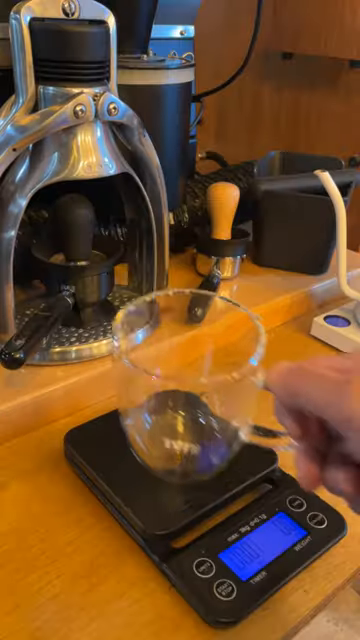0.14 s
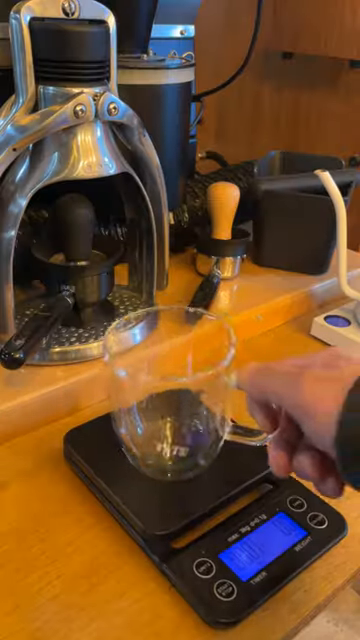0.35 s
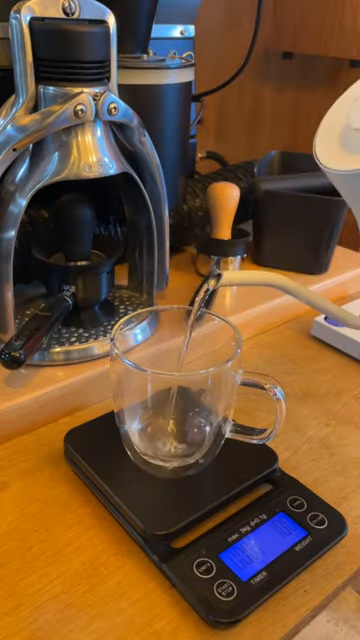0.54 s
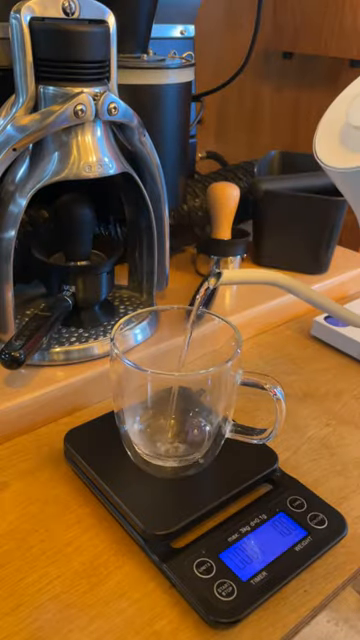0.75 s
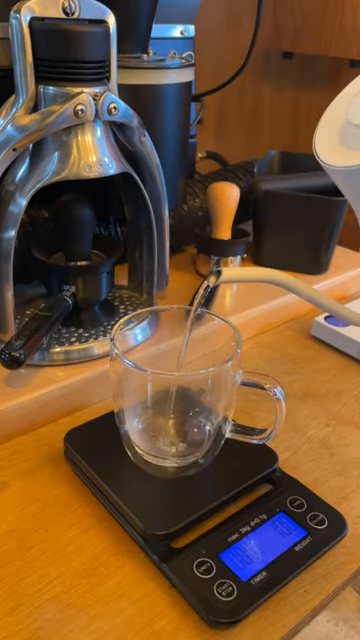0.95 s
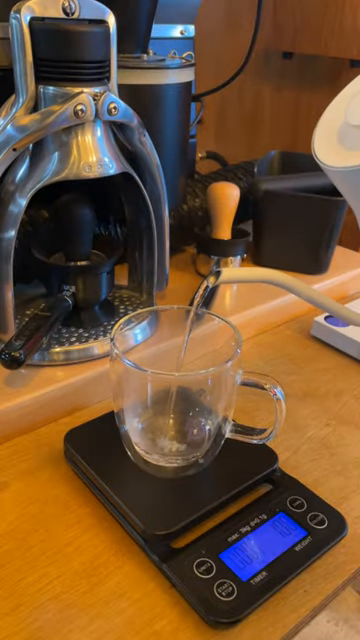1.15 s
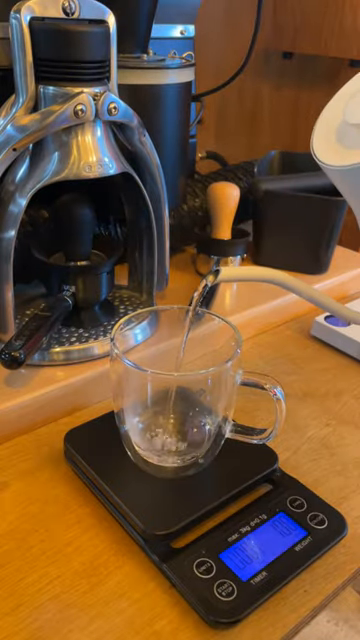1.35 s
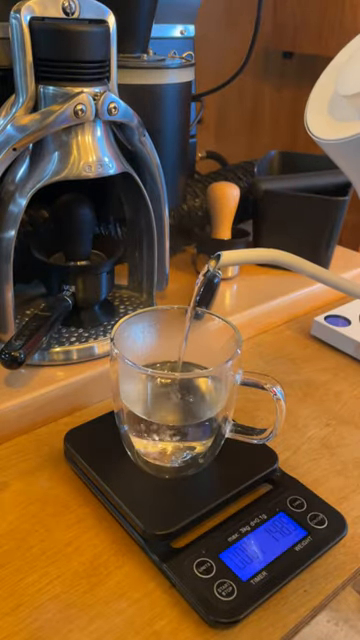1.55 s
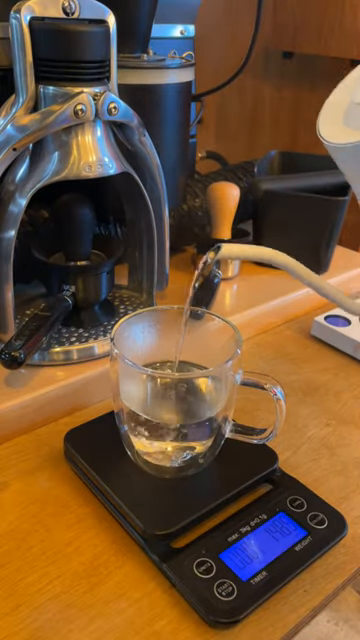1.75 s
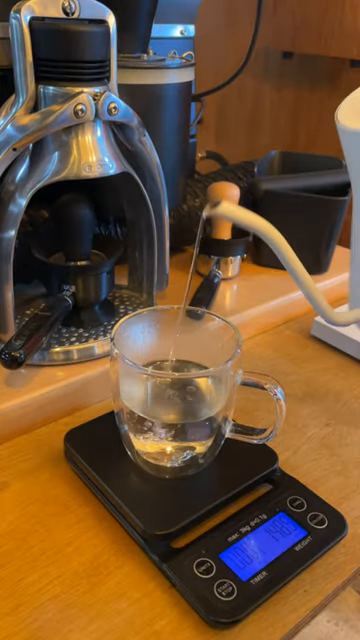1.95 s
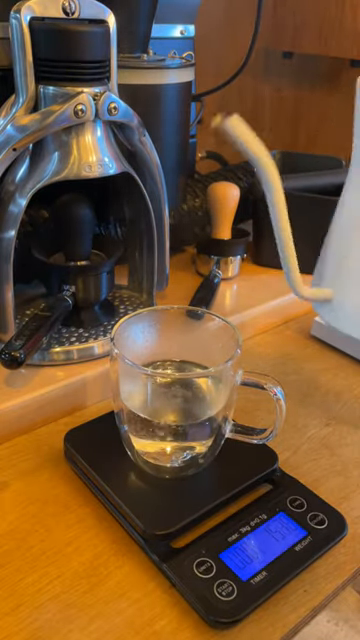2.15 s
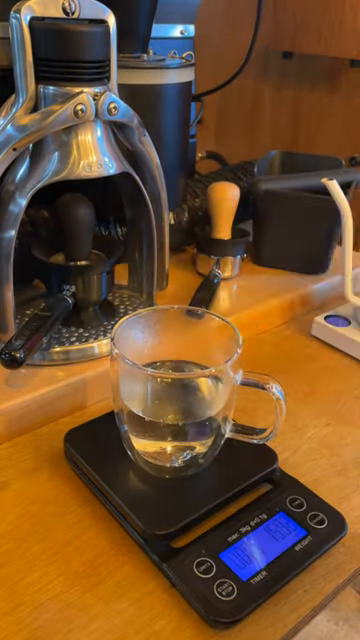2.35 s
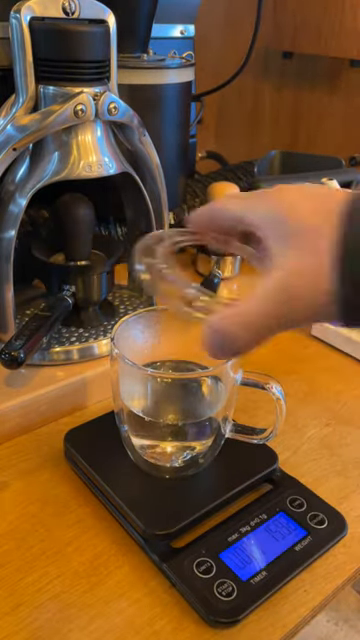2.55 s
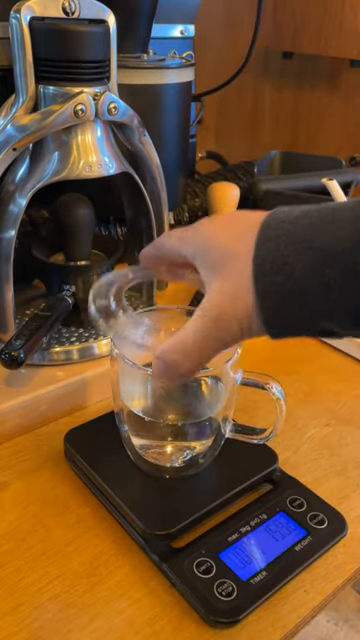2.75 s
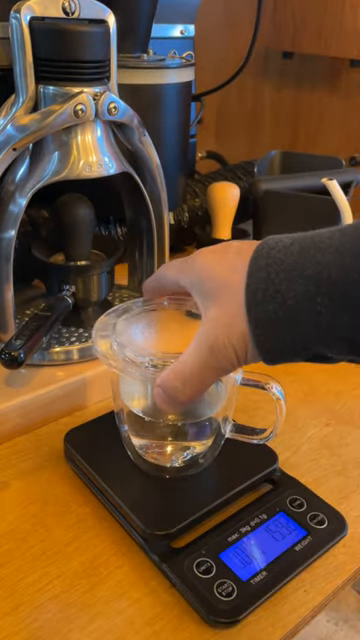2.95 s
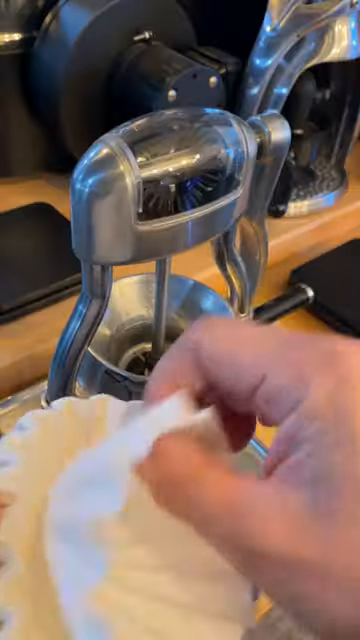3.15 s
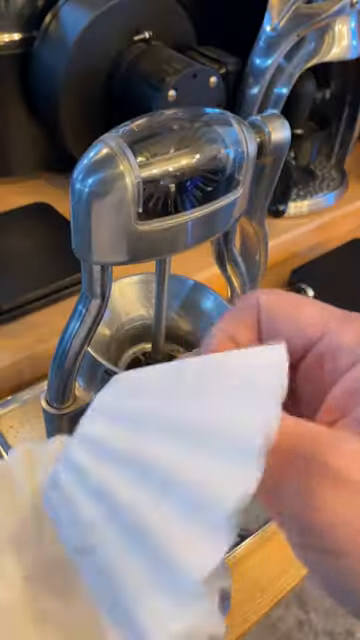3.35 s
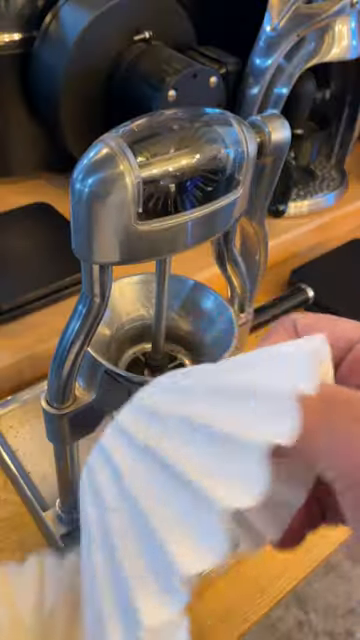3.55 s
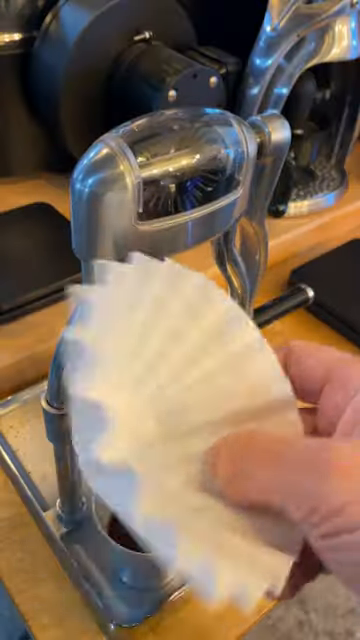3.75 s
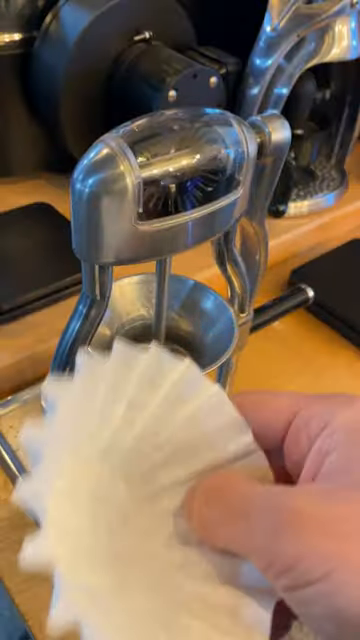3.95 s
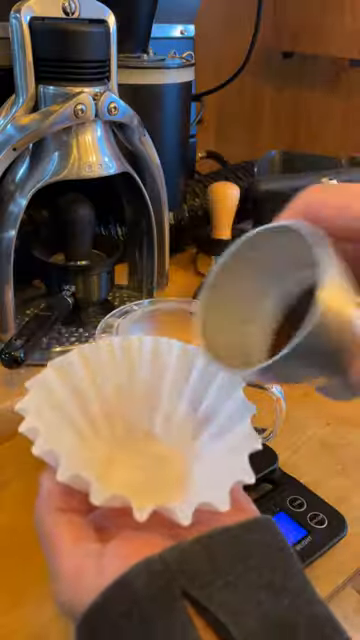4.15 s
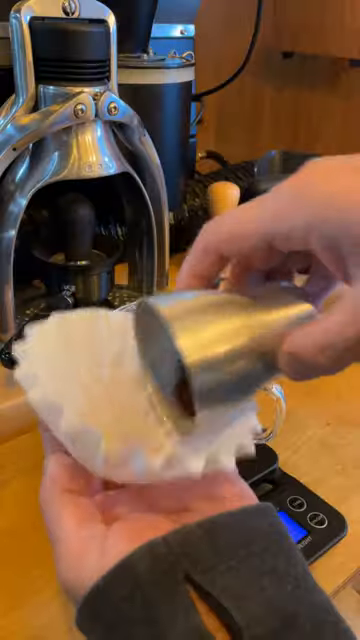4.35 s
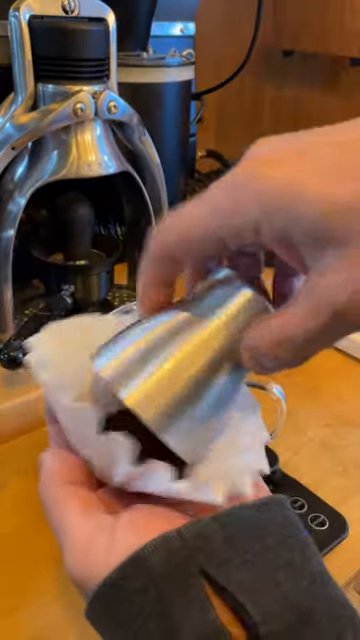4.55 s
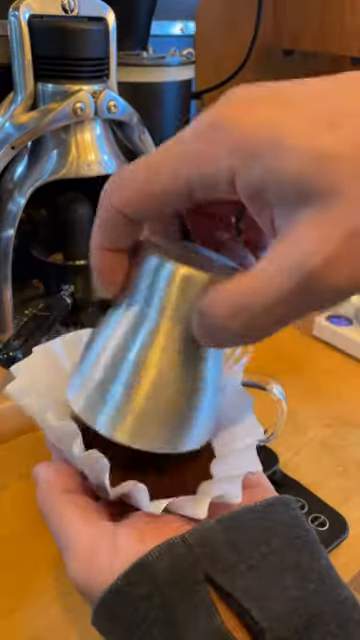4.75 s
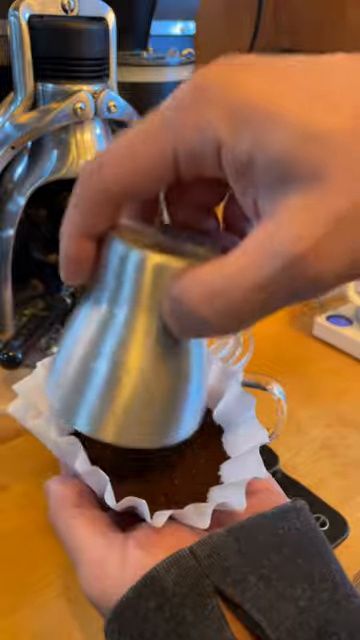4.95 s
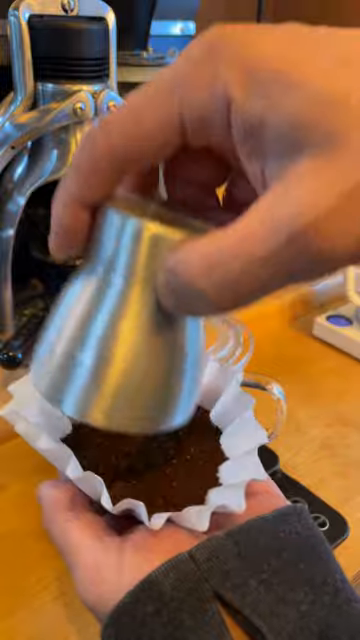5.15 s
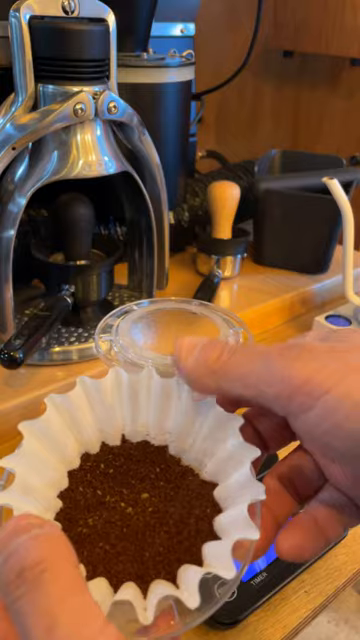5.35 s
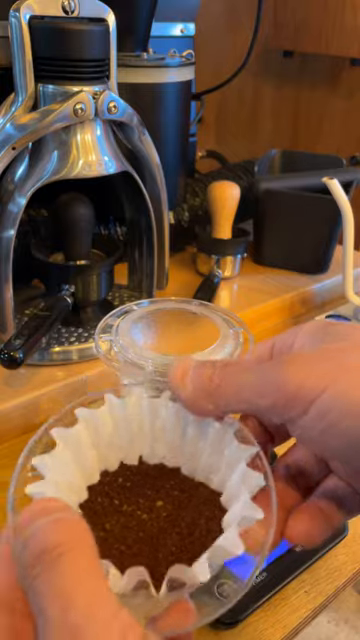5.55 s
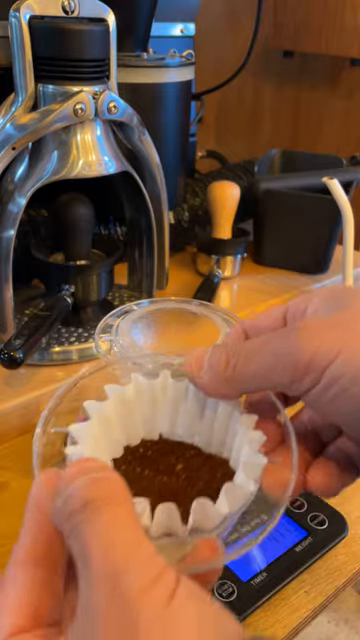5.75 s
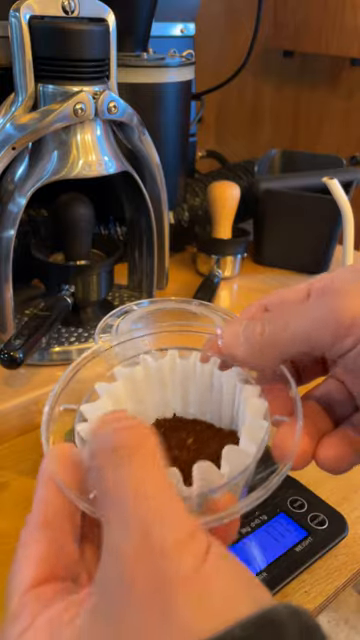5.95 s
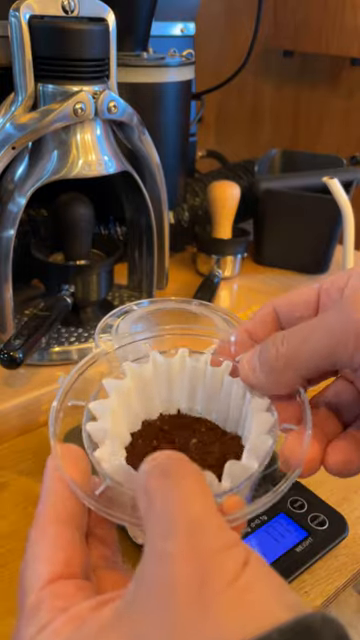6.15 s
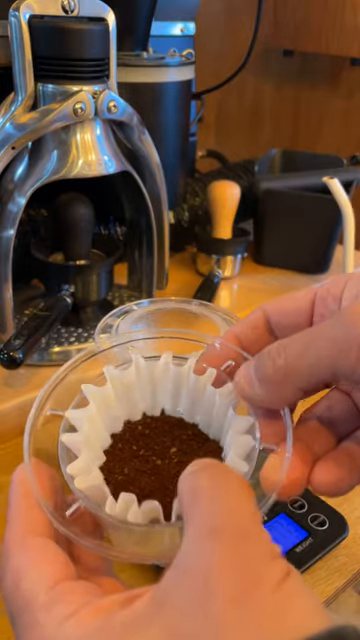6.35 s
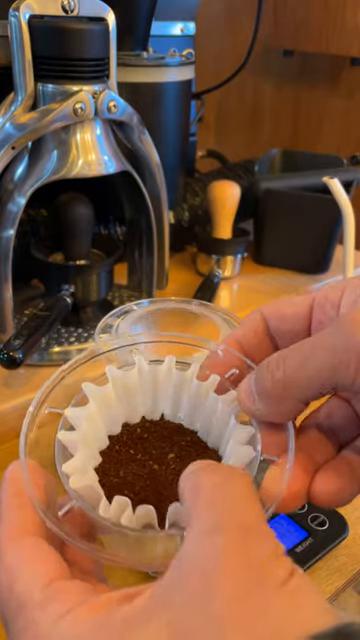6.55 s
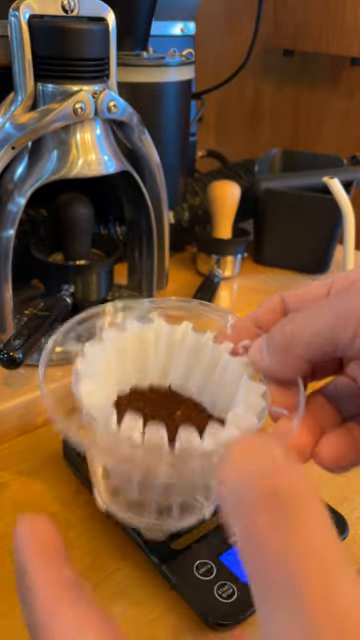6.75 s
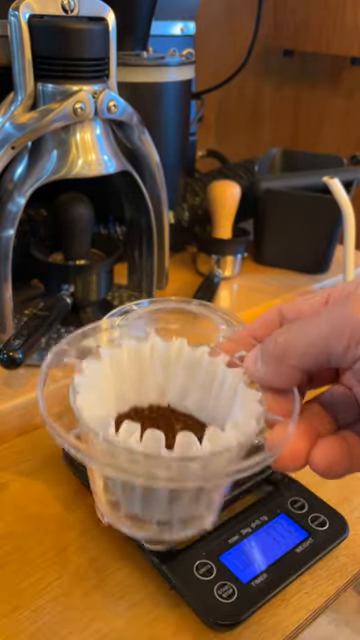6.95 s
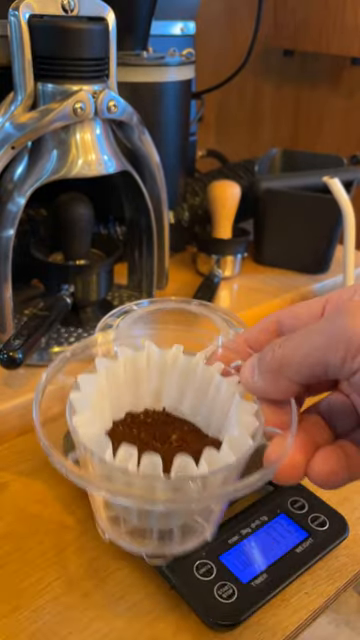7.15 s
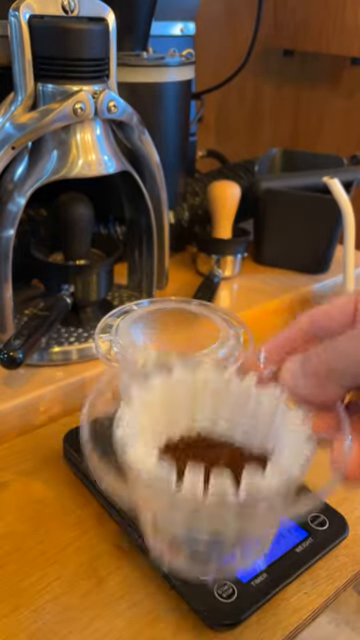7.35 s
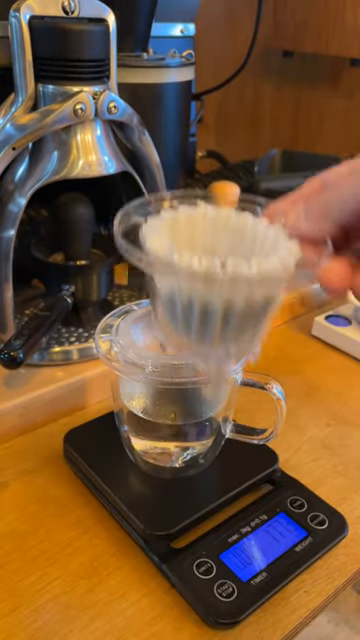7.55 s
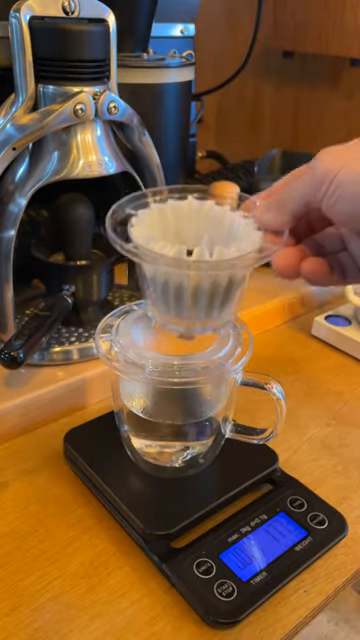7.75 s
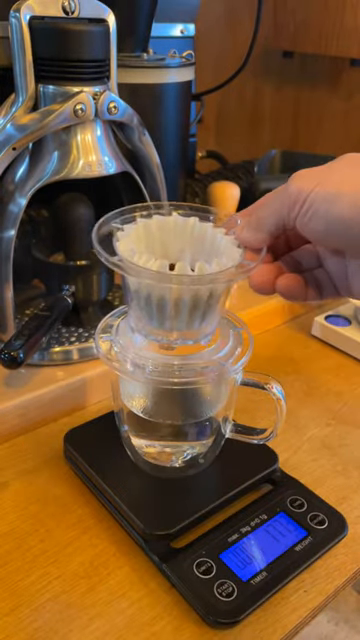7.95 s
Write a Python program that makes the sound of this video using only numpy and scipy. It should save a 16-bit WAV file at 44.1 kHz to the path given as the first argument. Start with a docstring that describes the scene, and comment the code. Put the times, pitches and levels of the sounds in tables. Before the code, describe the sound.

Close to the microphone in a small room, with low room tone throughout. At about 0.4 seconds a glass mug knocks down on a kitchen scale, the loudest sound. From 0.5 seconds a thin stream of water patters on the glass with a light, high ringing, turning to bubbles and drips from about 1.3 until 2.3 seconds. A faint echo of the kettle being put back dies away at 2.4. Around 2.9 a plastic collar clacks onto the mug in a few quick blows. From 3.1 to 4 a pleated paper filter is peeled off, rustling and snapping with soft bumps. Coffee grounds slide in with quieter crinkles until about 4.9. From 5.4 to 6.5 the paper rubs and crackles into a dripper, followed by faint shakes near 7. At about 7.9 the plastic dripper rattles into the collar. Several times the ringing stops abruptly.

```python
"""A small room, close up, on a two-port microphone. A glass mug knocks down on a kitchen scale; water
from a kettle rings its wall, then bubbles as it fills. The echo of the kettle put back dies away and a
plastic collar clacks on. A pleated paper filter is peeled off, rustling and snapping, filled with grounds,
pressed into a dripper and shaken level; last, the dripper rattles into the collar. Low room tone lies
underneath, and at several moments all ringing stops short."""
import sys
import numpy as np
from scipy import signal
from scipy.fft import rfft, irfft, next_fast_len
from scipy.io import wavfile
from scipy.ndimage import uniform_filter1d

SR = 44100
rng = np.random.default_rng(int(sys.argv[2]) if len(sys.argv) > 2 else 0)


def master_out(mix):
    """Clip the mix to full scale and print it as 16-bit PCM to the path in sys.argv[1]."""
    frames = np.transpose(np.atleast_2d(mix))
    ceiling = np.clip(frames, -1, 1)
    pcm = np.round(ceiling * 32767).astype(np.int16)
    wavfile.write(sys.argv[1], SR, pcm)


N = 357210

# mug foot on the scale: (time [s], level [dB], contact [s], low modes [dB])
MUG_KNOCKS = [(.36, -7, 0.0038, -6.5), (.397, -14.5, 0.005, 0), (0.38, -19.5, 0.003, -5.5)]
# mug and scale ringing together: (frequency [Hz], level [dB], t60 before damping [s])
SCALE_MODES = [(70, -6.5, 0.18), (99, -5.5, .18), (132.4, 0, 0.24), (200, -17, 0.2), (292.5, -14, 0.24),
               (429, -7.5, 0.1), (580, -15.5, 0.062), (633, -14, 0.16), (800, -18, 0.1), (975, -13.5, 0.15),
               (1129, -15.5, 0.11), (1657, -25, 0.083), (2940, -22, 0.096), (3670, -32.5, 0.27)]
# crack of the mug's contact: (frequency [Hz], level [dB])
MUG_CRACK = [(88, -25.5), (150, -10.5), (240, -17), (637, -14), (1360, -27.5), (1630, -19), (3840, -30),
             (8730, -37), (12200, -36), (16000, -49.5)]
# ringing of the mug wall: (frequency [Hz], nominal width [Hz], level [dB])
WALL_MODES = [(2390, 280, -8.5), (2810, 38, -6), (3270, 56, -5.5), (4030, 290, -9), (5100, 300, -18.5),
              (6590, 130, -15.5), (7130, 200, -11.5), (9900, 60, -13), (11000, 390, -1.5), (11160, 38, -9),
              (12200, 150, -6), (12900, 47, -18), (14100, 170, -13)]
# patter of the stream on the glass: (time [s], relative level [dB])
STREAM = [(.501, -57), (.8, -79), (1.1, -65), (1.4, -77), (1.55, -88.5), (2.383, -100)]
# clear hits of water on bare glass: (time [s], relative level [dB], treble [dB])
SPLASHES = [(0.5041, -40.5, 2), (0.5264, -39, -11), (0.584, -40, -9), (0.6709, -56, 13.5),
            (0.7664, -63, 14), (0.838, -64, 18), (0.846, -50.5, 11), (0.9055, -37, -1), (0.931, -42, -3),
            (0.938, -43.5, -18), (0.987, -50, 8), (1.006, -44.5, 4), (1.0443, -37.5, -0.5),
            (1.1006, -41, -27), (1.18, -45.5, -22), (1.2096, -50, -3), (1.264, -51, 12), (1.3024, -54, -10),
            (1.3605, -49, -21)]
# bubbles and drips: (time [s], level [dB], pitch [Hz], tick [dB])
BUBBLES = [(.527, -45, 2280, -25), (.939, -43.5, 2700, -14), (1.045, -43.5, 2330, -30),
           (1.101, -35, 2390, -23), (1.283, -58, 939, -16), (1.304, -46, 970, -13),
           (1.327, -41.5, 975, -27), (1.362, -46, 4030, -25), (1.439, -45.5, 1930, -34.5),
           (1.464, -48, 1360, -33), (1.705, -62, 1520, -29), (1.727, -46, 1290, -25),
           (1.782, -61, 2080, -23), (1.815, -66.5, 1047, 6), (1.877, -47, 1274, -18),
           (1.908, -37, 1500, -11.5), (1.963, -28, 1294, -20), (2.01, -40, 755, -15),
           (2.03, -30, 2890, -13), (2.072, -46.5, 1050, -7.5), (2.093, -34.5, 1180, -20),
           (2.116, -33, 1325, -20.5), (2.144, -66, 1010, 7), (2.236, -44.5, 1370, -8.5),
           (2.289, -53.5, 4250, -29)]
# swarms of small bubbles: (time [s], length [s], level [dB], first pitch [Hz])
GURGLES = [(0.89, 0.073, -55, 1920), (1.271, 0.065, -50.5, 1060), (1.404, 0.082, -55, 1170),
           (1.583, 0.074, -63, 3470), (1.679, 0.08, -60, 1360), (1.835, 0.053, -65, 1670),
           (1.988, 0.11, -49, 800)]
# collar going on: (time [s], level [dB], contact [s], low modes [dB])
COLLAR_KNOCKS = [(2.838, -34.5, 0.0015, -12), (2.866, -21.5, 0.002, -23), (2.877, -39, 0.018, -13),
                 (2.910, -24.5, 0.0043, 2), (2.915, -21.5, 0.006, -0.5)]
# dripper lowered into the collar: (time [s], level [dB])
DRIPPER_KNOCKS = [(7.87, -36.5), (7.879, -33.5), (7.904, -33.5), (7.93, -37), (7.889, -37.5),
                  (7.967, -36.5), (7.985, -20.5), (7.995, -29), (8.002, -22), (8.015, -28)]
# ringing of the two plastic parts: (frequency [Hz], level [dB], t60 before damping [s])
COLLAR_MODES = [(646, -11, 0.16), (1096, 2, 0.022), (1360, -14.5, 0.096), (2390, -12.5, 0.036),
                (3150, -17, 0.046), (5430, -24, 0.067), (6460, -10, 0.026), (7400, -11, 0.02),
                (11300, -16, 0.012)]
DRIPPER_MODES = [(794, -3.5, 0.05), (963, -7, 0.6), (1545, -5, 0.24), (1670, -6, 0.15), (2090, -0.5, 0.037),
                 (2890, -5.5, 0.16), (3060, -3.5, 0.043), (3860, -10, 0.058), (7100, -23, 0.055)]
# crack of plastic: (frequency [Hz], level [dB])
PLASTIC_CRACK = [(180, -62), (300, -30.5), (946, 1.5), (1230, -10.5), (1510, -5), (2980, -6), (4370, -16.5),
                 (6410, -9), (11900, -11), (16000, -36)]
# a curve each for peeling, filling, pressing in, levelling: (time [s], body [dB], treble over body [dB])
HANDLING = [
    [(3.083, -46, -1), (3.16, -52, 0), (3.2, -48, -11), (3.3, -47, -2.5), (3.39, -74, -3), (3.5, -69, -1.5),
     (3.6, -47.5, -11.5), (3.7, -50, -6.5), (3.81, -50, -9), (3.83, -66, -10), (3.94, -52.5, -11.5),
     (4.03, -64.5, -5)],
    [(4.1, -70, -13), (4.25, -80, -7), (4.4, -82, 9.5), (4.62, -66.5, 7.5), (4.75, -71.5, 12.5),
     (4.83, -74, 5), (4.95, -96.5, 22)],
    [(5.352, -61, -5), (5.48, -57.5, -10.5), (5.612, -56, -8), (5.8, -74, 2.5), (5.95, -75, 7),
     (6.2, -64.5, 3.5), (6.4, -76, -7.5), (6.527, -69, -13)],
    [(6.527, -101, 3.5), (7.4, -78, -3.5)],
]
# fingers rubbing, grounds sliding: (time [s], body [dB], half width [s], boom over body [dB])
RUBS = [(3.126, -33.5, 0.013, -20), (3.246, -36.5, 0.0086, -16), (3.263, -35.5, 0.0039, -13),
        (3.35, -39.5, 0.015, 4), (3.556, -41.5, 0.0063, 3), (3.898, -46, 0.0048, 3.5),
        (4.012, -50, 0.01, 5), (4.163, -64.5, 0.03, 4.5), (4.244, -62.5, 0.028, 4.5),
        (4.322, -54, 0.034, 0), (4.415, -58.5, 0.051, 6.5), (4.513, -65, 0.0062, 5),
        (4.552, -55.5, 0.023, 6), (4.71, -59.5, 0.03, 2), (4.817, -55, 0.0082, -8),
        (4.845, -63.5, 0.014, -7), (5.389, -49, 0.021, 9.5), (5.485, -56, 0.026, 13.5),
        (5.597, -47.5, 0.018, -13), (5.692, -44, 0.022, -5), (5.771, -46, 0.015, -22),
        (5.891, -48.5, 0.0036, 2), (6.077, -56.5, 0.022, -15), (6.186, -54.5, 0.0081, 6),
        (6.307, -61, 0.015, 5), (6.368, -56, 0.035, -6), (6.43, -60.5, 0.012, 13),
        (7.329, -66.5, 0.022, -7)]
# paper body when loose, taking grounds, in the dripper: (frequency [Hz], level [dB]); starts: (time [s])
PAPER_BODY = [
    [(88, -26), (150, 0.5), (214, -3.5), (285, -6), (375, -5), (1870, -10.5), (2100, -9), (3300, -12),
     (7000, -23.5), (9100, -54)],
    [(88, -31), (150, 0.5), (534, -2.5), (984, -2), (1080, -6), (1590, -9.5), (2160, -4), (3200, -19.5),
     (3800, -17), (4400, -19), (7000, -59), (9100, -64)],
    [(88, -17), (150, -2.5), (285, -5), (501, -13), (552, 0), (598, -5.5), (1000, 2), (2460, -8.5),
     (3860, -11.5), (5870, -14), (9100, -29)],
]
PAPER_BODY_FROM_S = [0, 4.03, 5.352]
# treble of the paper and tick of every pop: (frequency [Hz], level [dB])
CRISP_TREBLE = [(1500, -51), (3000, -9), (5800, -13), (7200, -2.5), (11500, 0.5), (14000, -15),
                (16500, -14.5)]
# pleats snapping: (time [s], level [dB], pitch [Hz], tick [dB])
SNAPS = [(3.111, -33, 2540, 5), (3.244, -20, 2620, -21), (3.259, -20.5, 1810, -14), (3.297, -26, 2500, -9),
         (3.445, -25, 1920, -5.5), (3.641, -21, 1370, -14), (3.657, -32, 1510, -22),
         (3.749, -22.5, 830, -19), (3.76, -25, 1350, -16), (3.858, -37.5, 1970, -2.5),
         (3.899, -30.5, 1800, -1), (4.344, -31.5, 4700, -8.5), (4.427, -38, 630, -4),
         (4.506, -26, 900, -32), (4.571, -34, 600, -10), (4.68, -34.5, 730, -20), (4.697, -37, 895, -9),
         (4.817, -34.5, 1120, -18), (5.789, -43.5, 1130, 14), (5.802, -30.5, 1440, -4),
         (5.846, -31.5, 1990, 2), (5.856, -33, 1290, 3), (6.053, -37, 1290, -22), (6.073, -36, 2010, 0),
         (6.187, -30, 1180, -17), (6.305, -38, 1390, -24), (6.518, -45, 2000, -8), (6.58, -38, 1250, -11),
         (7.15, -48, 1820, -2.5)]
# soft bumps through hand and table: (time [s], level [dB], pitch [Hz])
BUMPS = [(2.922, -41.5, 135), (3.356, -32, 70.0), (3.446, -34.5, 200), (3.642, -30.5, 299),
         (3.659, -33, 269), (3.779, -38.5, 90), (4.241, -48.5, 156), (6.51, -33.5, 66.4), (7.882, -42, 118),
         (7.944, -40, 91), (8.001, -38, 68.5)]
# echo of the kettle: (frequency [Hz], level [dB])
KETTLE_ECHO = [(120, -45), (200, -8), (916, -6.5), (1180, -7), (1480, -5), (5230, -11.5), (8580, -9),
               (11100, -9.5), (16000, -31)]
# room tone: (time [s], rumble [dB], air [dB])
ROOM_TONE = [(0, -49, -71), (.5, -63, -62), (.51, -57.5, -69), (1.3, -59, -67.5), (1.6, -64, -68.5),
             (2.38, -62.5, -69.5), (2.39, -60, -68), (4.03, -57, -64.5), (4.1, -63.5, -69),
             (5.34, -61, -66), (5.36, -58, -58.5), (6.52, -56, -62.5), (6.9, -62.5, -65),
             (7.86, -62.5, -63.5), (7.88, -49.5, -56.5)]
# rumble of the room: (frequency [Hz], level [dB])
RUMBLE = [(25, -23.5), (40, -2), (62, 3.5), (120, -6), (190, -18), (300, -18.5)]
# three colours of room air: (frequency [Hz], level [dB]); starts: (time [s])
AIR = [
    [(90, -36), (150, -8.5), (350, -17.5), (700, -21.5), (1250, -25.5), (2300, -40), (5000, -45.5),
     (8000, -39.5), (11700, -36.5), (13500, -56), (16000, -68)],
    [(88, -30), (150, -2.5), (524, -14), (730, -17.5), (1260, -20.5), (2360, -31.5), (2810, -31),
     (4170, -38), (6640, -29.5), (11900, -29), (16000, -69)],
    [(88, -15), (150, 1.5), (341, -8), (494, -5.5), (566, -9.5), (1500, -9), (2760, -32.5), (4080, -22.5),
     (5570, -33.5), (10800, -22.5), (16000, -55)],
]
AIR_FROM_S = [0, 4.03, 5.352]
# low tones of the opening half second: (frequency [Hz], level [dB])
LOW_THROB = [(43.1, -47.5), (70.0, -45.5), (107.7, -52)]
# moments when ringing and reverberation stop short: (time [s])
STOPS_S = [0, .501, 2.383, 3.083, 3.812, 4.03, 4.398, 5.352, 6.527, 7.87]
# phase between the microphone ports: (frequency [Hz], left lead [rad])
PORT_PHASE = [(0, 0), (600, .3), (2100, .3), (3500, 1.3), (5200, 1.1), (5800, -1.2), (7600, -2.6),
              (12600, -5.6), (16400, -6.4)]

TIME = np.arange(N) / SR
WIDE_ABOVE_HZ = 290   # below this the room sounds much alike at both ports


def mug_on_scale():
    """The glass foot strikes the scale and the two ring as one body."""
    return knocks(MUG_KNOCKS, SCALE_MODES, MUG_CRACK, modes_db=-5, crack_db=0.63, damping=0.83)


def water_on_glass(small_hits=45, covered_s=1.42, sag_per_s=.025):
    """Patter and splashes ring the mug wall; later splashes ring slightly lower as the water rises."""
    first_s, end = STREAM[0][0], int(STREAM[-1][0] * SR)
    stream = (TIME > first_s) * amp(curves(STREAM)[0] - 28)
    patter = (stream * rms_one(grains(900, spread_db=2)))[:end]
    t, decay = dying(0.027, seconds=.14)
    burst = decay * (1 - np.exp(-t / 0.00056))
    when, size = rng.random((small_hits, 2)).T   # weak hits fall until water covers the bottom
    hits = list(SPLASHES)
    hits += zip(first_s + (covered_s - first_s) * when, -67 + 10 * size, np.full(small_hits, -0.5))

    def wall(drive, hz, width, mode_db):
        """One mode of the glass: a narrow tone over a broad splat."""
        tone = signal.lfilter(*signal.iirpeak(hz, 5, SR), ring(drive, hz, 1.12 * width))
        return amp(mode_db + 8.7 * np.log10(width / 30)) * tone + amp(-23) * ring(drive, hz, .3 * hz)

    out = np.zeros(N)
    for hz, width, mode_db in WALL_MODES:
        out[:end] += wall(patter, hz, 2 * width, mode_db)
        for s, db, treble_db in hits:
            gain = amp(db - 27 + (hz > 5000) * treble_db + rng.normal(0, 4))
            pitch = hz * (1 - sag_per_s * (s - .9) + rng.normal(0, .012))
            add(out, s, wall(gain * burst * rng.standard_normal(len(t)), pitch, width, mode_db))
    return out


def bubbles():
    """Single bubbles and drips pop in the mug, each rising in pitch as it dies."""
    return pops(BUBBLES, cycles=24.7, longest_s=0.028, glide=7.2,
                tone_db=-4, noisy=0.83, tick_t60=0.025, broad=0.44)


def gurgles(count=28, climb=2.3, tick_db=-34):
    """Small bubbles come in swarms, the pitch climbing through each swarm."""
    swarm = []
    for s, length_s, db, first_hz in GURGLES:
        when, size, spread = rng.random((count, 3)).T
        hz = first_hz * climb ** when * 1.7 ** (spread - .5)
        swarm += zip(s + length_s * when, db + 4.5 - 12 * size, hz, np.full(count, tick_db))
    return pops(swarm, cycles=22, longest_s=0.022, glide=5.2,
                tone_db=-7, noisy=0.89, tick_t60=.02, broad=0.53)


def collar():
    """The plastic collar clacks onto the mug in a few quick blows."""
    return knocks(COLLAR_KNOCKS, COLLAR_MODES, PLASTIC_CRACK, modes_db=-4.5, crack_db=-0.5, damping=0.54)


def dripper(seated_s=7.98, contact_s=0.01):
    """The dripper rattles into the collar, damped by the hand until it is seated."""
    held = [(s, db, contact_s, 0) for s, db in DRIPPER_KNOCKS if s < seated_s]
    seated = [(s, db, contact_s, 0) for s, db in DRIPPER_KNOCKS if s > seated_s]
    return (knocks(held, DRIPPER_MODES, PLASTIC_CRACK, modes_db=-6.5, crack_db=-3, damping=0.27)
            + knocks(seated, DRIPPER_MODES, PLASTIC_CRACK, modes_db=-8, crack_db=-4.5, damping=0.51))


def paper_filter(in_dripper_s=5.9):
    """The handled sheet rustles and snaps; once in the dripper it also rings the plastic wall."""
    body_db, treble_db = np.full(N, -120.), np.zeros(N)
    for rows in HANDLING:
        inside = (TIME > rows[0][0]) & (TIME < rows[-1][0])
        body_db[inside], treble_db[inside] = np.array(curves(rows))[:, inside]
    paper = rustle(body_db, treble_db) + snaps(body_db)
    return paper + amp(-26) * ring(paper * (TIME > in_dripper_s), hz=3850, width_hz=260)


def rustle(body_db, treble_db, boom_below_hz=700):
    """Clumped fibre clicks sound in the sheet's boom, body and treble, swelling with each rub or shake."""
    clumps = uniform_filter1d(rng.standard_normal(N), 260)
    fibres = grains(2500, spread_db=1.25) * amp(3 * rms_one(clumps))
    power, boom_power = amp(body_db) ** 2, amp(body_db) ** 2
    stretch = np.searchsorted(STOPS_S, TIME)
    # four shakes level the grounds, the first one light
    shakes = [(6.82 + 0.0843 * k, -63.5 if k else -73.5, 0.022, 0) for k in range(4)]
    for s, db, half_s, boom_db in list(RUBS) + shakes:
        near = slice(int((s - .12) * SR), int((s + 0.091) * SR))
        swell = amp(-6 * (abs(TIME[near] - s) / half_s) ** 2.33)
        swell *= stretch[near] == np.searchsorted(STOPS_S, s)
        power[near] += (amp(db) * swell) ** 2
        boom_power[near] += (amp(db + boom_db) * swell) ** 2
    body = pleats(colour_by_stretch(fibres, PAPER_BODY_FROM_S, PAPER_BODY))
    boom = signal.sosfiltfilt(signal.butter(2, boom_below_hz, fs=SR, output="sos"), body)
    treble = amp(treble_db) * colour(fibres, CRISP_TREBLE)
    return np.sqrt(boom_power) * boom + np.sqrt(power) * (body - boom + treble)


def pleats(body, wander_db=6, step_samples=2000):
    """Hollows between the pleats resonate, each opening and closing by itself as the sheet bends."""
    hollows = 0
    for hz in np.geomspace(800, 3160, num=7):
        knots = rng.standard_normal(N // step_samples + 2)
        opening = np.interp(np.arange(N) / step_samples, np.arange(len(knots)), knots)
        hollows += amp(wander_db * opening) * signal.lfilter(*signal.iirpeak(hz, 8, SR), body)
    return 0.69 * body + amp(-10.5) * hollows


def snaps(body_db, count=120, low_hz=690, high_hz=2980, tick_db=-7):
    """Pleats snap clearly among small random crinkles whose strength follows the handling."""
    when, size, pitch = rng.random((count, 3)).T
    first_s, last_s = HANDLING[0][0][0], HANDLING[2][-1][0]
    s = first_s + (last_s - first_s) * when
    db = body_db[(s * SR).astype(int)] + 6.5 - 10 * size
    crinkles = list(zip(s, db, low_hz * (high_hz / low_hz) ** pitch, np.full(count, tick_db)))
    return pops(list(SNAPS) + crinkles, cycles=35, longest_s=0.017, glide=0.093,
                tone_db=-7.5, noisy=1.05, tick_t60=0.0093, broad=0.83)


def bumps(sheet_above_hz=170, drop_s=.003):
    """Damped thuds through hand and table; those of the bending sheet drop into pitch from above."""
    out = np.zeros(N)
    t, decay = dying(t60=0.08)
    for s, db, hz in BUMPS:
        drop = (hz > sheet_above_hz) * 3 * drop_s * (1 - np.exp(-t / drop_s))
        add(out, s, amp(db) * decay * np.sin(2 * np.pi * hz * (t + drop)))
    return out


def kettle_echo(start_s=2.383):
    """The echo of the kettle put back: faint noise dying away."""
    out = np.zeros(N)
    t, decay = dying(t60=0.41, seconds=.7)
    add(out, start_s, amp(-49) * decay * colour(rng.standard_normal(len(t)), KETTLE_ECHO))
    return out


def room(x, t60=0.36, treble_t60=0.072, tail_db=-10):
    """Close direct sound over a small room's tail, which dulls as it dies and ends at each stop."""
    t, decay = dying(t60)
    shared, side = rng.standard_normal((2, len(t)))
    diffuse = 0.86 * shared + filtered(side, 1, WIDE_ABOVE_HZ, "high") * [[1], [-1]]
    dull = filtered(diffuse, 1, 2500, "low")
    response = (dull * decay + (diffuse - dull) * amp(-60 * t / treble_t60)) * (t > .003)
    response *= amp(tail_db) / np.sqrt(np.sum(response ** 2) / 2)
    response[:, 0] = 1   # direct path to the microphone
    return np.hstack([signal.fftconvolve(x[None, a:b], response, axes=1)[:, :b - a]
                      for a, b in stretches(STOPS_S)])


def room_tone():
    """Rumble reaches both ports alike; the hiss of the air is wider."""
    rumble_db, air_db = curves(ROOM_TONE)
    rumble = amp(rumble_db) * colour(rng.standard_normal(N), RUMBLE)
    shared, side = (colour_by_stretch(rng.standard_normal(N), AIR_FROM_S, AIR) for _ in range(2))
    side = filtered(side, 1, [WIDE_ABOVE_HZ, 3000], "band")
    return rumble + amp(air_db) * (shared + 0.86 * side * [[1], [-1]])


def throb_and_hum(hum_hz=118, hum_ends_s=1.27):
    """A low throb in the background gives way to a faint hum, which fades during the pour."""
    throb = sum(amp(db - 0.5) * np.sin(2 * np.pi * hz * TIME) for hz, db in LOW_THROB)
    hum = amp(-61) * np.sin(2 * np.pi * hum_hz * TIME) * np.clip((hum_ends_s - TIME) / 0.11, 0, 1)
    return np.where(TIME < STOPS_S[1], throb, hum)


def knocks(events, modes, crack, modes_db, crack_db, damping, low_hz=1000, detune=.007):
    """Each blow rings every mode anew; the chatter of the contact shakes them on and makes a crack."""
    out = np.zeros(N)
    for s, db, contact_s, low_db in events:
        t, chatter = dying(4.88 * contact_s, seconds=0.23)
        strengths = amp(rng.normal(0, 2.6, len(modes))) * rng.choice([-1, 1], len(modes))
        body = 0
        for strength, (hz, mode_db, t60) in zip(strengths, modes):
            decay = amp(mode_db + low_db * (hz < low_hz) - 60 * t / (damping * min(t60, .4)))
            onset = 1 - (hz < low_hz / 2) * np.exp(-t / 0.0052)
            pitch = hz * rng.normal(1, detune)   # each grip shifts the modes
            body += strength * decay * onset * np.sin(2 * np.pi * pitch * t)
        push = 0.27 * np.diff(chatter * rng.standard_normal(len(t)))[:int(.04 * SR)]
        push[0] = 1
        body = signal.fftconvolve(body, push)[:len(t)]
        noise = colour(rng.standard_normal(len(t)), crack)
        rise = 1 - np.exp(-t / 0.0017)   # the surfaces close over a moment
        add(out, s, amp(db) * rise * (amp(modes_db) * body + amp(crack_db) * chatter * noise))
    return filtered(out, 2, 45, "high")


def pops(events, cycles, longest_s, glide, tone_db, noisy, tick_t60, broad):
    """Short pitched pops, rising as they die, partly noise, each with a bright tick."""
    out = np.zeros(N)
    for s, db, hz, tick_db in events:
        t, decay = dying(min(cycles / hz, longest_s), seconds=.06)
        tone = np.sin(2 * np.pi * hz * t * (1 + glide * t))
        rough = rms_one(ring(ring(rng.standard_normal(len(t)), hz, broad * hz), hz, broad * hz))
        tick = amp(tick_db - 60 * t / tick_t60) * colour(rng.standard_normal(len(t)), CRISP_TREBLE)
        rise = 1 - np.exp(-t * hz / 0.12)
        add(out, s, amp(db) * (amp(tone_db) * rise * decay * (tone + noisy * rough) + tick))
    return filtered(out, 2, 420, "high")


def grains(per_s, spread_db):
    """Random clicks of uneven size over a little noise."""
    sizes = amp(spread_db * np.minimum(rng.exponential(1, N), 5))
    return rng.standard_normal(N) * (0.45 + sizes * (rng.random(N) < per_s / SR))


def ring(x, hz, width_hz):
    """Two-pole resonance; a unit click rings with height 1."""
    r, w = np.exp(-np.pi * width_hz / SR), 2 * np.pi * hz / SR
    return signal.lfilter([0, np.sin(w)], [1, -2 * r * np.cos(w), r * r], x + 1e-18)


def filtered(x, order, hz, kind):
    """Low, high or band pass."""
    return signal.sosfilt(signal.butter(order, hz, kind, fs=SR, output="sos"), x)


def colour(x, spectrum):
    """Shape a noise by a spectrum; rms 1."""
    hz, db = np.transpose(spectrum)
    size = next_fast_len(len(x))
    grid = np.log(np.fft.rfftfreq(size, 1 / SR) + 1)
    gain = amp(np.interp(grid, np.log(hz), db, -90, -90))
    return rms_one(irfft(rfft(x, size) * gain, size)[:len(x)])


def colour_by_stretch(x, starts_s, spectra):
    """A spectrum of its own for each stretch of time."""
    return np.hstack([colour(x[a:b], spectrum) for (a, b), spectrum in zip(stretches(starts_s), spectra)])


def stretches(starts_s):
    """Start and end sample of each stretch."""
    edges = [int(s * SR) for s in starts_s] + [N]
    return zip(edges, edges[1:])


def add(out, s, sound):
    """Place a sound; it ends at the next stop."""
    start = int(s * SR)
    stop = min([int(k * SR) for k in STOPS_S if k > s] + [N, start + len(sound)])
    out[start:stop] += sound[:stop - start]


def dying(t60, seconds=.4):
    """Time axis and exponential decay."""
    t = np.arange(int(seconds * SR)) / SR
    return t, amp(-60 * t / max(t60, .002))


def curves(rows):
    """Columns of a table over time."""
    s, *columns = np.transpose(rows)
    return [np.interp(TIME, s, c) for c in columns]


def amp(db):
    """dB to gain."""
    return 10 ** (np.asarray(db, float) / 20)


def rms_one(x):
    """Scale to rms 1."""
    return x / np.sqrt(np.mean(x ** 2) + 1e-20)


def scene():
    """The coffee things close to the microphone, the small room behind them."""
    knocking = mug_on_scale() + collar() + dripper()
    water = water_on_glass() + bubbles() + gurgles()
    return room(knocking + water + paper_filter() + bumps() + kettle_echo()) + room_tone() + throb_and_hum()


def record(dry, left_db=1.6, cutoff_hz=16500):
    """Two microphone ports: the left is shifted in phase and louder below 6 kHz; the top is cut."""
    size = next_fast_len(N + 4096)
    hz = np.fft.rfftfreq(size, 1 / SR)
    shift = np.exp(1j * np.interp(hz, *np.transpose(PORT_PHASE)))
    duller = amp(-left_db * (hz > 6000))
    left = irfft(rfft(dry[0], size) * shift * duller, size)[:N]
    ports = np.array([left * amp(left_db / 2), dry[1] * amp(-left_db / 2)])
    return signal.sosfilt(signal.cheby2(12, 70, cutoff_hz, fs=SR, output="sos"), ports)


dry = scene()
out = record(dry)
master_out(out)
```